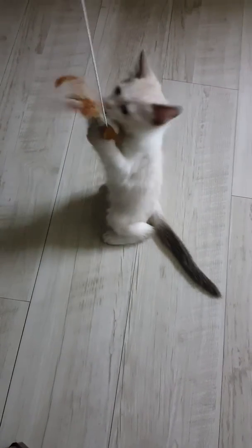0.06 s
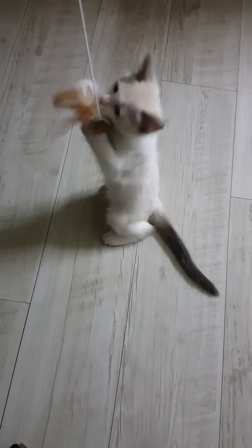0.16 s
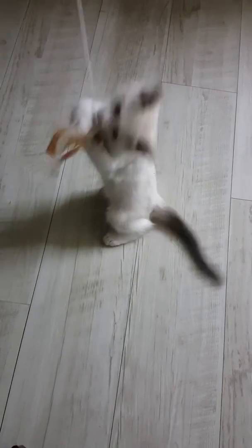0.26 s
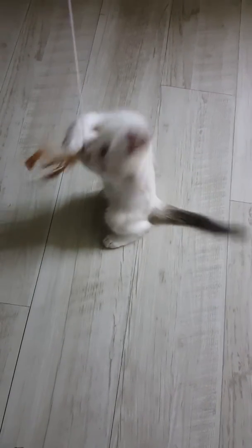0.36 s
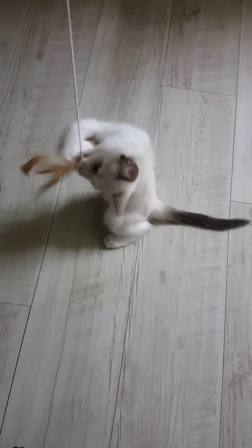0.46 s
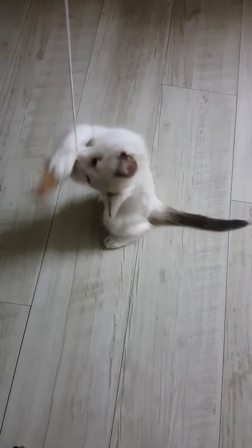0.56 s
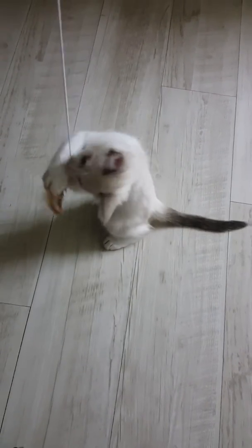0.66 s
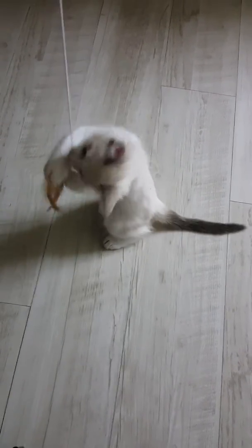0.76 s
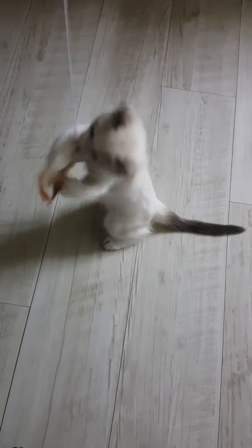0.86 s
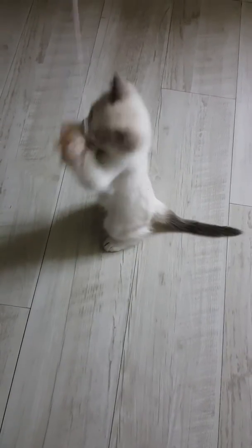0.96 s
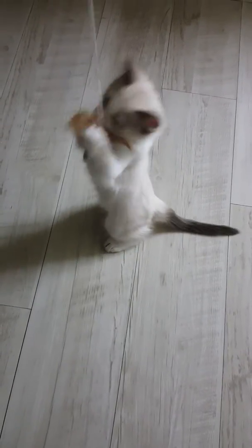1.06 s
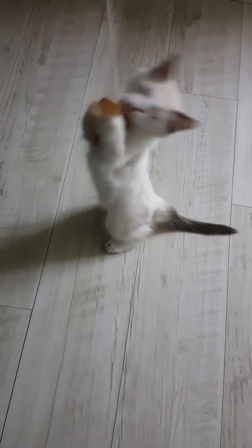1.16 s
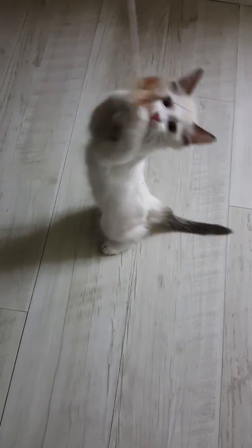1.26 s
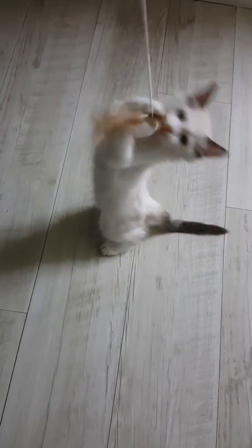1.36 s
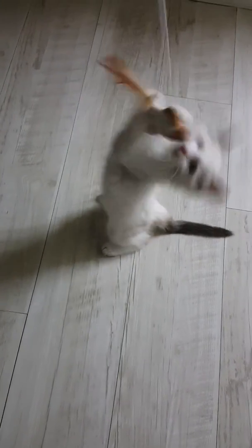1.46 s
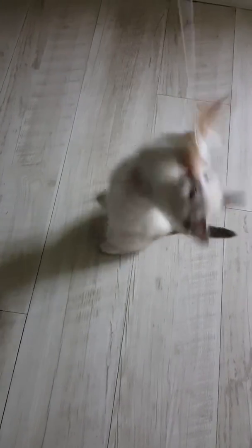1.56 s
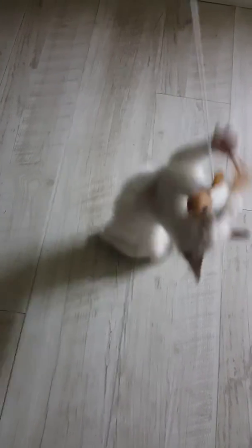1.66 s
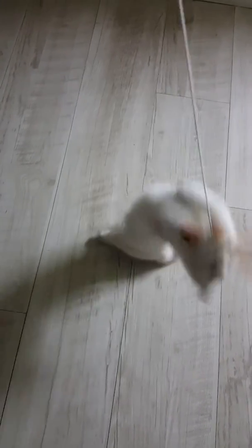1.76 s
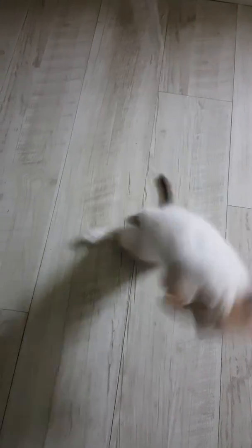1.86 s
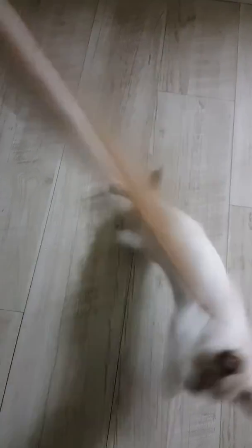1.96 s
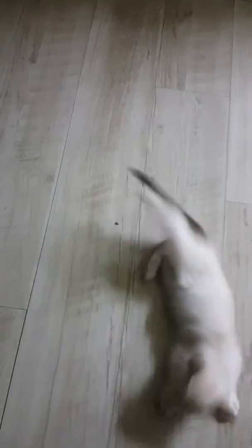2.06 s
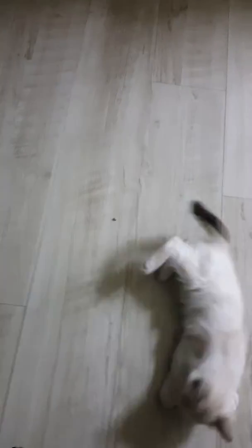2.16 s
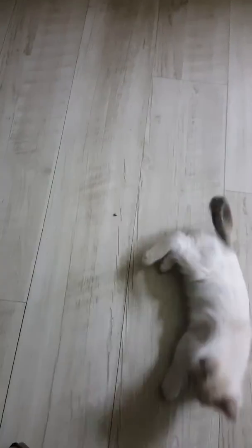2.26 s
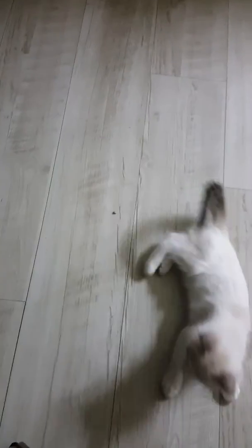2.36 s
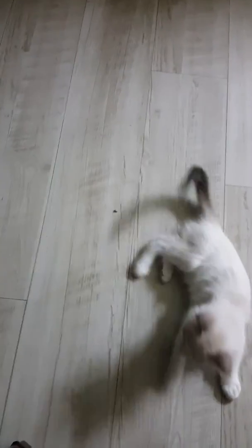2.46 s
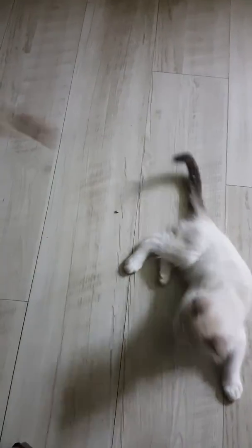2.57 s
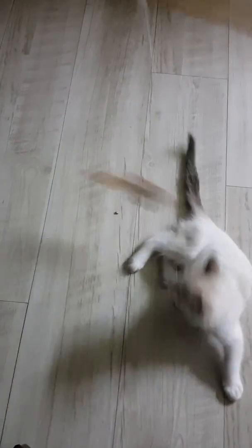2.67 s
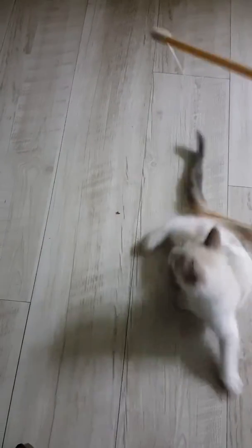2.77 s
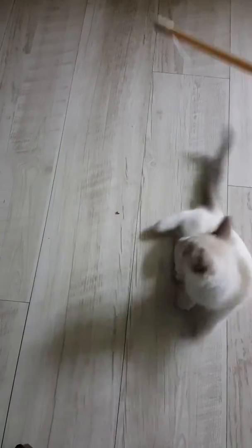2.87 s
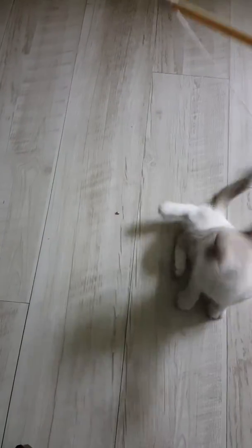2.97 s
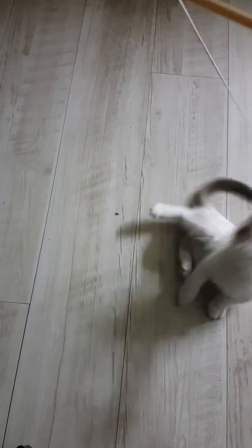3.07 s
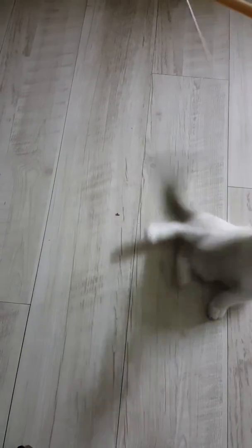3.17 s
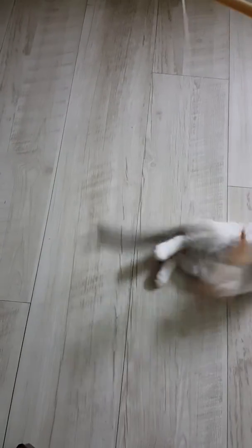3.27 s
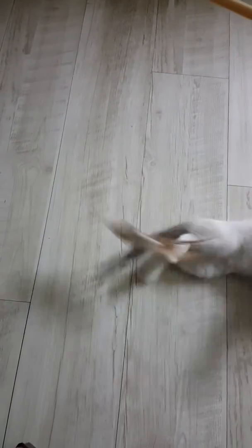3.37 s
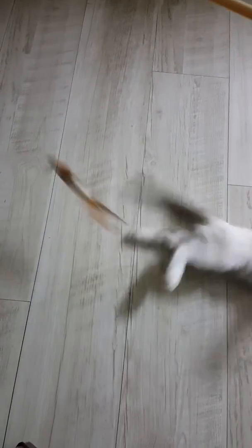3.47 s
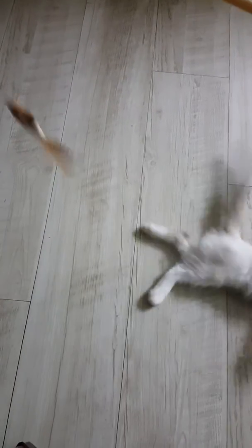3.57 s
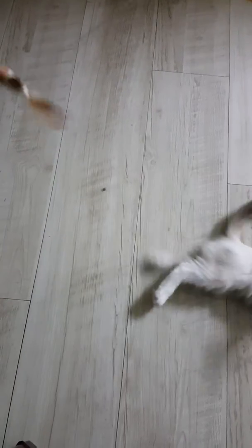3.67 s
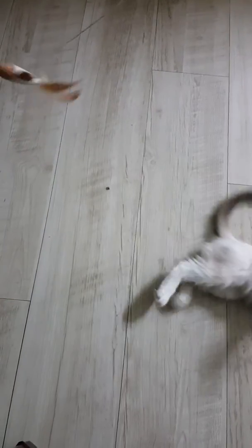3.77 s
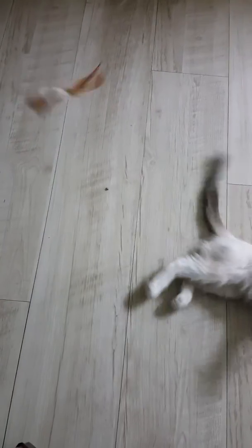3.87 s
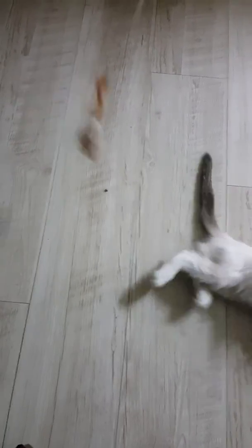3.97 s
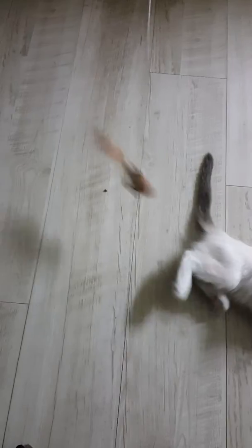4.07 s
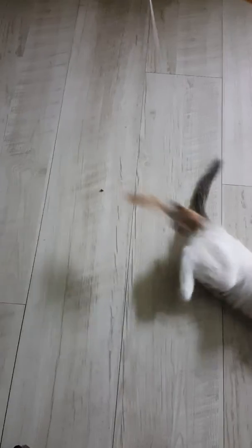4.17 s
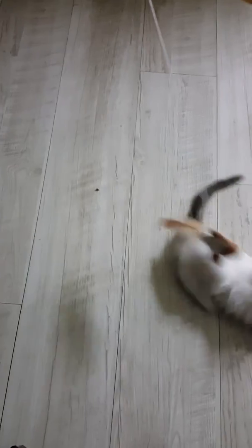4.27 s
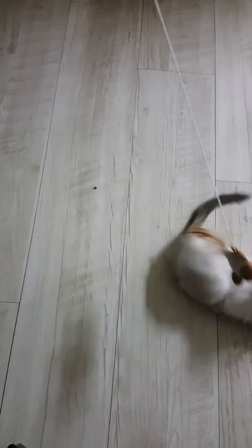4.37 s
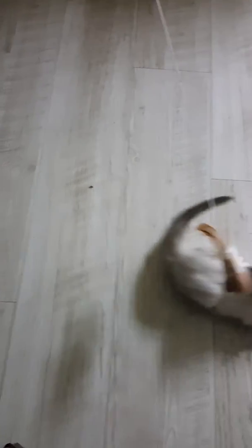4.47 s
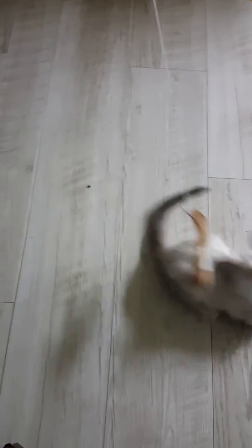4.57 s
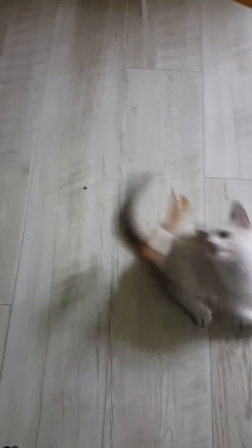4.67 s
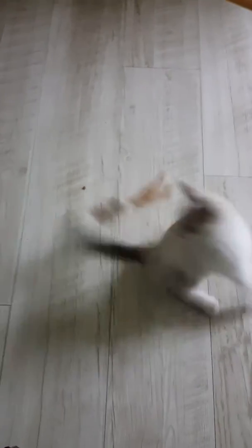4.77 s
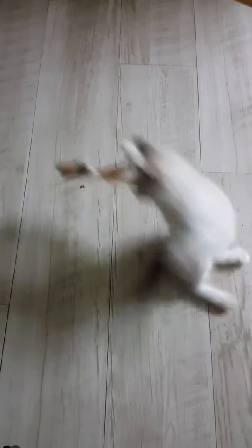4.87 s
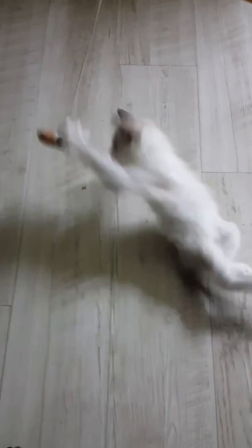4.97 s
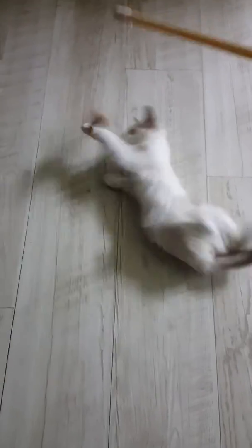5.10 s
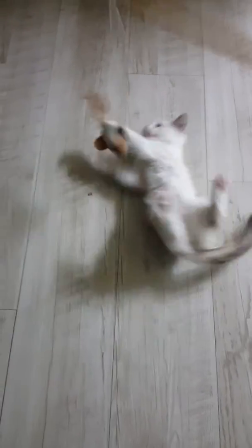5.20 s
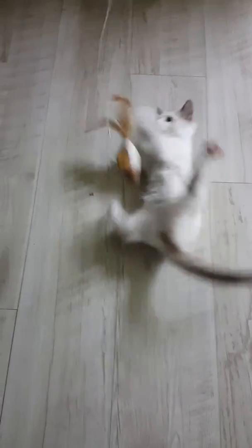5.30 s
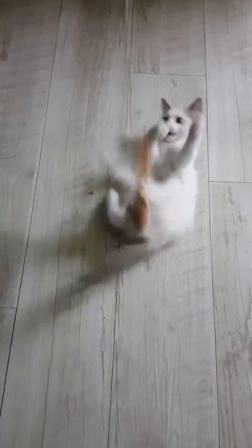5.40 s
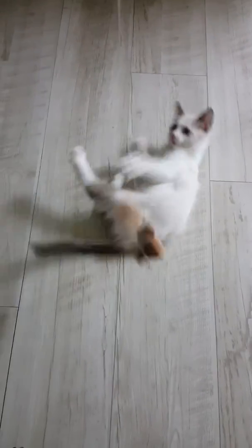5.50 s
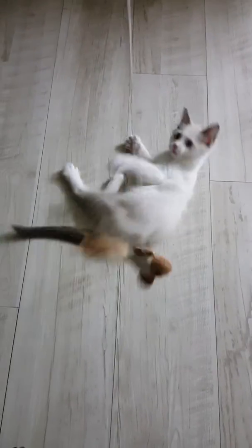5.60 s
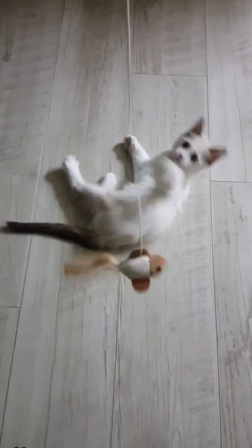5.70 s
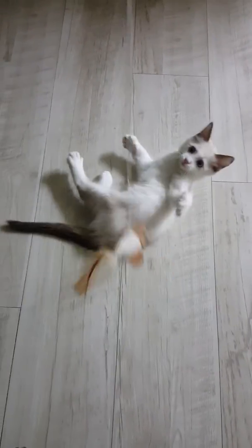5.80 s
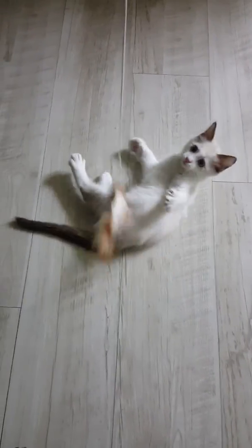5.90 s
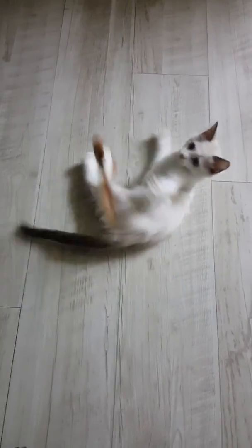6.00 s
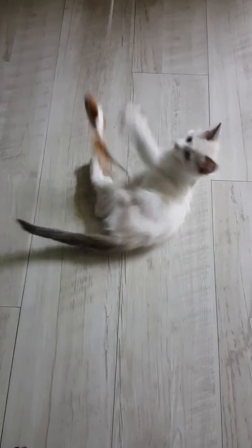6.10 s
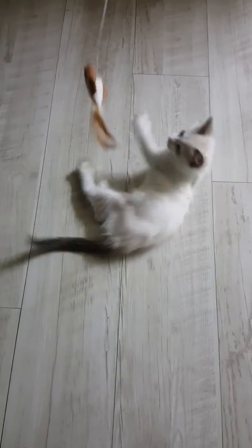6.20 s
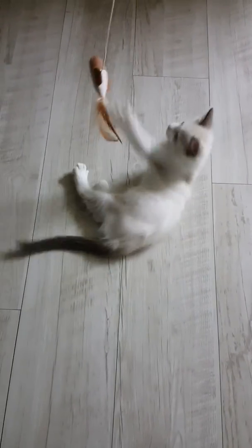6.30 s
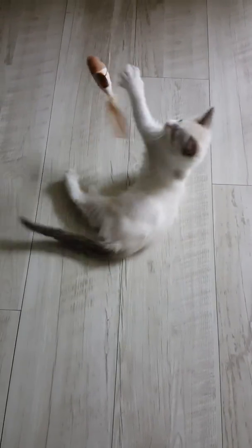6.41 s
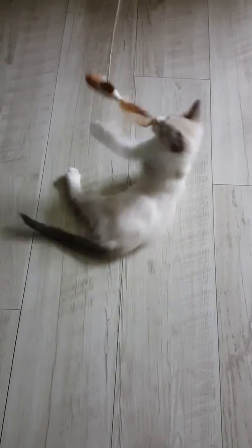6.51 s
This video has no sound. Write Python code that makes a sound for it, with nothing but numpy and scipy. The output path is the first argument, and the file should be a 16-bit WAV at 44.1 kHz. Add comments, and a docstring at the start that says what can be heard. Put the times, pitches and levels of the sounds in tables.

```python
"""Quiet room air, faint hum and hiss, then a soft sweep of fur: a kitten chases a feather toy on laminate.
Scuffs are clumped friction noise; claw and toy ticks are short bursts through one resonance.
Paws thump softly and land hard twice, and fingers knock dully near the end: padded impulses through
plank resonances, plus decaying floor modes. Fingers rub the hand-held camera, lightly early on and more
firmly at the end: stick-slip steps and friction through body resonances. Air puffs are low resonant noise."""
import sys
import numpy as np
from scipy import signal
from scipy.fft import rfft, irfft, next_fast_len
from scipy.io import wavfile
from scipy.ndimage import uniform_filter1d, map_coordinates

SR = 44100
rng = np.random.default_rng(int(sys.argv[2]) if len(sys.argv) > 2 else 0)


def pcm_store(signal):
    """Save signal as 16-bit PCM."""
    levels = np.round(np.clip(np.atleast_2d(signal), -1, 1) * 32767)
    wavfile.write(sys.argv[1], SR, levels.astype(np.int16).T)


N = 288722  # samples

# Still air: spectrum [freq_hz, relative_level_db]; left-right correlation [freq_hz, correlation]
AIR_SPECTRUM = [(12, -38.5), (20, -4), (44, -11), (81, 0.5), (113, -19.5), (133, -7), (233, -7.5),
                (254, -10), (284, -3), (308, -14.5), (408, -12.5), (1210, -21.5), (3800, -27.5),
                (5470, -32), (15800, -37.5)]
AIR_CORRELATION = [(60, 0.93), (200, 0.92), (380, 0.51), (700, .22), (1300, 0)]
AIR_LEVEL_DB = -64
# Distant appliance hum [freq_hz, level_db]
HUM_TONES = [(75, -82), (144, -85.5), (280, -84.5)]
# Microphone hiss spectrum [freq_hz, relative_level_db]
MIC_HISS_SPECTRUM = [(7000, -23), (10500, -13), (11800, -3), (12900, 7), (13200, 0.5), (13600, 10.5),
                     (15500, -1.5)]

# Room decay [freq_hz, t60_s]; echo left-right correlation [freq_hz, correlation]
ROOM_DECAY = [(100, 0.24), (300, 0.27), (700, 0.24), (1500, 0.36), (4000, 0.28), (12000, 0.18)]
ECHO_CORRELATION = [(120, 0.96), (260, 1), (420, -0.52), (650, 0.18), (1200, -0.67), (2200, -0.39),
                    (4500, -0.56)]

# Paws skidding and fur sweeping [full_s, level_db, hold_s, tilt_db_per_octave, rasp_hz]
SCUFF_EVENTS = [(.17, -71.5, 0.067, 2.5, 5070), (.52, -72.5, 0.024, 2, 3170), (1.039, -74.5, 0.16, 1, 8300),
                (2.076, -34, .014, -6.5, 3760), (2.092, -44.5, .035, -7, 2640),
                (2.418, -68, 0.0336, 0, 3900), (2.77, -67.5, 0.0263, 1, 3940),
                (3.492, -68.5, 0.049, 0.5, 3680), (3.585, -59.5, 0.048, -2, 4200),
                (4.915, -64, 0.033, -1, 4400), (5.045, -44.5, 0.0013, -7, 3280),
                (5.202, -54.5, 0.016, 0, 4770), (5.375, -59, 0.0053, -2.5, 4270),
                (5.642, -62, 0.0053, -0.5, 4800), (5.695, -66, .02, -4, 2820),
                (5.76, -66.5, 0.043, -6, 2370), (5.931, -57.5, 0.0083, -0.5, 2640),
                (6.055, -59, 0.067, 1, 2550), (6.324, -54, 0.018, 2, 8900)]
# Fur on floor spectrum [freq_hz, relative_level_db]
FUR_SPECTRUM = [(60, -18.5), (280, 9), (800, 4.5), (1300, -4.5), (2500, -1), (4300, -4.5), (5600, -9),
                (8400, -3), (9500, -15.5), (14000, -14)]
SCUFF_RISE_S, RISE_S_PER_HOLD_S = .0015, 0.29  # long strokes start more gently
SCUFF_FALL_S, FALL_S_PER_HOLD_S = 0.024, 1.4  # and die away more slowly

# Claws and toy ticking on the boards [start_s, level_db, pitch_hz, width_hz]
TICK_EVENTS = [(.917, -48.5, 3300, 2000), (1.055, -50, 4220, 1300), (1.326, -44.5, 3100, 350),
               (1.391, -47.5, 7200, 800), (1.714, -45.5, 5940, 4520), (1.925, -31, 2000, 7900),
               (2.411, -50, 3826, 1205), (4.935, -44, 5063, 3012), (5.201, -38, 6300, 1200)]

# Paws and body meeting the floor; near 6.19 and 6.38 s, dull finger knocks on the camera
# [start_s, level_db, sharpness_hz, spot_hz]
THUMP_EVENTS = [(.943, -46.5, 560, 330), (1.708, -42, 600, 220), (1.712, -40, 890, 244),
                (1.809, -51, 1100, 910), (2.070, -17, 1005, 750), (2.087, -6.5, 950, 600),
                (2.101, -16.5, 800, 906), (2.389, -50, 379, 400), (3.295, -55, 600, 650),
                (3.379, -51, 394, 336), (3.4924, -17, 1120, 1170), (3.655, -48, 600, 720),
                (4.336, -46.5, 600, 600), (4.477, -51, 419.4, 456), (4.925, -43, 197, 104),
                (5.042, -34, 1850, 1580), (5.0482, -28.5, 626, 345), (5.182, -40.5, 450, 560),
                (5.3691, -33, 520, 570), (5.380, -34.5, 504, 610), (5.580, -48, 520, 650),
                (5.646, -39, 558, 475), (5.650, -40, 514, 350), (6.189, -43.5, 337, 230),
                (6.383, -41.5, 1100, 800)]
# Broad resonances of the struck plank [freq_hz, width_hz, gain_db]
PLANK_MODES = [(111.7, 24, -28.5), (262, 21, -7), (345, 150, -2), (520, 120, 1), (610, 130, 4),
               (670, 91, -7), (950, 200, -14), (1300, 180, -20), (1760, 450, -22)]
# Long floor ringing [freq_hz, level_db, t60_s]
FLOOR_RINGING = [(103, -15, 0.32), (145.4, -14, 0.33), (276, -3, 0.19), (350, -10.5, 0.34),
                 (451.3, -10, 0.27), (503, -6.5, 0.3), (570.7, -7, 0.1), (589, -3, 0.21), (627, -5, 0.21),
                 (716, -6.5, 0.31), (854, -9.5, 0.27), (887, -7.5, 0.357), (992, -8.5, .22),
                 (2000, -11.5, 0.21)]
# Reference pad sharpness, its weight boost, extra boost of softer contacts
PAD_HZ, WEIGHT_DB, WEIGHT_DB_PER_OCTAVE = 600, 5, 7.5

# Fingers shifting on the camera [full_s, level_db, hold_s, sliding_speed_0_to_1]
RUB_STROKES = [(0.943, -51, 0.011, 0.21), (1.031, -52.5, 0.038, 0), (1.08, -60, .025, 0.36),
               (1.2, -64, 0.032, 0.2), (6.199, -55, 0.025, 0.19), (6.318, -59.5, 0.082, 0.39),
               (6.386, -44, 0.033, .52), (6.433, -41.5, 0.027, 0.7), (6.467, -44.5, 0.039, .95),
               (6.52, -41, .012, 0.53)]
RUB_RISE_S, RUB_FALL_S = 0.0032, 0.061  # catches quickly, lets go slowly
# Best sliding speed, loss in dB per unit of speed away from it
FLEXING, SCRAPING, HISSING = (.02, 11.6), (0.6, 20.5), (0.88, 33)
# Low resonances of the camera body [freq_hz, width_hz, gain_db]
BODY_FLEX_MODES = [(259, 76, 0.5), (351, 58, -8.5)]
# Hollow ring of the camera case [freq_hz, width_hz, gain_db]
CASE_MODES = [(800, 210, -0.5), (962, 62, -1), (1180, 37, -12)]
# Finger hiss spectrum [freq_hz, relative_level_db]
FINGER_HISS_SPECTRUM = [(1000, -22.5), (1600, -3.5), (2600, -10), (3500, -8), (4500, 2.5), (5500, -11),
                        (7300, -0.5), (8500, -6), (9500, -17), (15000, -14.5)]
# Puffs of air at the microphone [full_s, level_db]
AIR_PUFFS = [(3.53, -61), (4.22, -71), (4.909, -56.5), (5.251, -77), (5.52, -65), (5.84, -58),
             (6.219, -55.5)]
PUFF_RISE_S, PUFF_HOLD_S, PUFF_FALL_S = 0.017, 0.039, 0.29

# Microphone pair [freq_hz, left_minus_right_db]
PORT_DIFFERENCE = [(100, 0.5), (280, -0.5), (600, -1), (1000, 0.5), (2000, 3.5), (4500, -1.5), (7500, 2),
                   (12000, 1.5)]
TOP_HZ = 15850


def amp(db):
    """Decibels to amplitude ratio."""
    return 10 ** (np.asarray(db) / 20)


def unit(x):
    """Scale to unit RMS."""
    return x / np.sqrt(np.mean(x ** 2) + 1e-20)


def along(points, hz):
    """Interpolate (freq_hz, value) points on a log frequency axis."""
    freq_hz, values = np.transpose(points)
    return np.interp(np.log(hz + 1), np.log(freq_hz), values)


def wobble(knots_per_s):
    """Smooth random curve."""
    knots = rng.standard_normal(int(N * knots_per_s / SR) + 4)
    return map_coordinates(knots, [np.arange(N) * knots_per_s / SR])


def filtered(x, response):
    """Multiply the spectrum of x by a complex response of frequency in Hz."""
    n = x.shape[-1]
    padded = next_fast_len(n + 8192)  # space for the filter to ring out
    spectrum = rfft(x, padded) * response(np.fft.rfftfreq(padded, 1 / SR))
    return irfft(spectrum, padded)[..., :n]


def resonances(modes, f):
    """Summed causal response of (freq_hz, width_hz, gain_db) resonances."""
    return sum(amp(gain_db) * 1j * f * width_hz / (hz * hz - f * f + 1j * f * width_hz)
               for hz, width_hz, gain_db in modes)


def spread(pair, correlation):
    """Mix two unrelated signals to left and right with the given correlation."""
    def mix(f):
        angle = np.arccos(np.clip(along(correlation, f), -1, 1)) / 2
        return np.array([np.cos(angle), np.sin(angle)])

    mid, side = filtered(pair, mix)
    return np.array([mid + side, mid - side])


def add(track, start_s, x):
    """Mix x into the track in place."""
    part = track[..., max(round(start_s * SR), 0):][..., :x.shape[-1]]
    part += x[..., :part.shape[-1]]


def swell(t, rise_s, hold_s, fall_s):
    """Rise to full strength at t = 0, hold, then fade by 20 dB per fall_s."""
    rise = np.exp(-(np.minimum(t, 0) / rise_s) ** 2)
    return rise * amp(-20 * np.maximum(t - hold_s, 0) / fall_s)


def friction(shape, grain_db):
    """Countless tiny slips of uneven size, clumped over about a millisecond."""
    clumps = unit(uniform_filter1d(rng.standard_normal(shape), size=48))
    return unit(rng.standard_normal(shape) * amp(grain_db * clumps))


def echoes(x, early_db, early_t60_s, gap_s):
    """Fresh stereo room answer at the RMS of x: dense early echoes of floor and furniture, then the walls' tail."""
    hz, t, noise = signal.stft(rng.standard_normal((2, SR // 2)), SR, nperseg=256)
    late = amp(-60 * t / along(ROOM_DECAY, hz)[:, None])
    early = amp(early_db - 60 * t / early_t60_s)
    tail = spread(signal.istft(noise * (late + early), SR, nperseg=256)[1], ECHO_CORRELATION)
    tail *= np.arange(tail.shape[1]) / SR > gap_s
    wet = signal.fftconvolve(x[None], tail, axes=1)[:, :len(x)]
    return unit(wet) * np.sqrt(np.mean(x ** 2))


def room_tone(mic_hiss_db=-85):
    """Partly correlated air noise, hum wavering in level and phase, and independent microphone hiss."""
    air = spread(rng.standard_normal((2, N)), AIR_CORRELATION)
    air = unit(filtered(air, lambda f: amp(along(AIR_SPECTRUM, f))))
    t = np.arange(N) / SR
    hum = sum(amp(db + 1.5 * wobble(5.2)) * np.sin(2 * np.pi * hz * t + .9 * wobble(5.2))
              for hz, db in HUM_TONES)
    mic_hiss = unit(filtered(rng.standard_normal((2, N)), lambda f: amp(along(MIC_HISS_SPECTRUM, f))))
    return amp(AIR_LEVEL_DB + .3 * wobble(2)) * air + hum + amp(mic_hiss_db) * mic_hiss


def scuffs(echo_db=-1, rasp_db=7):
    """Friction strokes swell, hold and fade; wood grain adds a rasping band."""
    out = np.zeros((2, N))
    t = np.arange(int(SR * .8)) / SR - .2  # starts early, to contain the rise
    for full_s, level_db, hold_s, tilt_db, rasp_hz in SCUFF_EVENTS:
        def colour(f):
            rasp = rasp_db * np.exp(-(np.log2((f + 1) / rasp_hz) / 0.47) ** 2)
            tilt = tilt_db * np.log2(np.maximum(f, 1000) / 3000)
            return amp(along(FUR_SPECTRUM, f) + rasp + tilt)

        slips = unit(filtered(friction(len(t), grain_db=3), colour))
        rise_s = SCUFF_RISE_S + RISE_S_PER_HOLD_S * hold_s
        fall_s = SCUFF_FALL_S + FALL_S_PER_HOLD_S * hold_s
        stroke = slips * swell(t, rise_s, hold_s, fall_s)
        wet = echoes(stroke, early_db=1.5, early_t60_s=0.08, gap_s=0.001403)
        add(out, full_s + t[0], amp(level_db) * (stroke + amp(echo_db) * wet))
    return out


def ticks(echo_db=0):
    """Hard tips snap, with a few milliseconds of scratch behind, through one resonance."""
    out, t = np.zeros((2, N)), np.arange(SR // 3) / SR
    for start_s, level_db, pitch_hz, width_hz in TICK_EVENTS:
        scratch = 0.054 * rng.standard_normal(len(t)) * amp(-60 * t / 0.011)
        burst = (t == 0) + scratch
        click = filtered(burst, lambda f: resonances([(pitch_hz, width_hz, 0)], f))
        click /= np.abs(click).max()
        wet = echoes(click, early_db=6.5, early_t60_s=0.042, gap_s=0.0045)
        add(out, start_s, amp(level_db) * (click + amp(echo_db) * wet))
    return out


def boost(f, hz, width_hz, gain_db):
    """Resonant peak over a flat response."""
    return 1 + (amp(gain_db) - 1) * resonances([(hz, width_hz, 0)], f)


def thumps(echo_db=1, ring_db=-19, spot_db=5, underlay_hz=2200):
    """A padded blow bends one plank and rings the floor, softer ones duller; finger knocks use the same model."""
    out, t = np.zeros((2, N)), np.arange(SR // 2) / SR
    for start_s, level_db, sharp_hz, spot_hz in THUMP_EVENTS:
        weight_db = WEIGHT_DB + WEIGHT_DB_PER_OCTAVE * np.log2(PAD_HZ / sharp_hz)

        def drive(f):
            pad = 1 / (1 + 1.3j * f / sharp_hz - (f / sharp_hz) ** 2) / (1 + .4j * f / sharp_hz)
            # underlay swallows the treble
            underlay = 1 / (1 + 1j * f / underlay_hz - (f / underlay_hz) ** 2)
            spot = boost(f, spot_hz, spot_hz / 4, spot_db)
            joists = boost(f, 160, 140, weight_db)  # driven by body weight
            return pad * underlay * spot * joists

        knock = filtered(1. * (t == 0), lambda f: -drive(f) * resonances(PLANK_MODES, f))
        knock /= np.abs(knock).max()

        def phase_cycles(hz):
            # shorter waves reach the two ports further out of step
            start = rng.random()
            side = rng.choice([-1, 1]) * np.array([[1], [-1]])
            return start + side * np.minimum(hz / 5500, .125)

        ring = 0
        for hz, mode_db, t60_s in FLOOR_RINGING:
            strength = abs(drive(hz)) * amp(mode_db + rng.normal(0, 1) - 60 * t / t60_s)
            ring = ring + strength * np.sin(2 * np.pi * (hz * t + phase_cycles(hz)))
        ring *= amp(ring_db) * (1 - np.exp(-t / 0.0026))
        wet = echoes(knock, early_db=-0.5, early_t60_s=0.032, gap_s=.002)
        direct = knock * amp([[-.5], [.5]])
        add(out, start_s, amp(level_db) * (direct + ring + amp(echo_db) * wet))
    return out


def rubbing(best_speed, loss_db):
    """Envelope of the strongest finger stroke driving a part that favours one sliding speed."""
    t = np.arange(N) / SR
    strokes = [amp(level_db - loss_db * abs(speed - best_speed))
               * swell(t - full_s, RUB_RISE_S, hold_s, RUB_FALL_S)
               for full_s, level_db, hold_s, speed in RUB_STROKES]
    return np.max(strokes, axis=0)


def draught():
    """Strength of the stirred air: every puff has the same shape."""
    t = np.arange(N) / SR
    return sum(amp(level_db) * swell(t - full_s, PUFF_RISE_S, PUFF_HOLD_S, PUFF_FALL_S)
               for full_s, level_db in AIR_PUFFS)


def handling(base_slips_per_s=260, smooth_db=-6):
    """Skin sticks and slips on the camera's hollow case and hisses at its ports; stirred air rumbles faintly."""
    slip_count = np.floor(np.cumsum(base_slips_per_s * amp(4 * wobble(150))) / SR)
    slips = np.diff(slip_count, prepend=0) * amp(2.4 * wobble(120))
    drive = unit(slips - slips.mean()) + amp(smooth_db) * friction((2, N), grain_db=0.5)
    flex = unit(filtered(drive, lambda f: resonances(BODY_FLEX_MODES, f) / (1 + (f / 450) ** 4)))
    scrape = unit(filtered(drive, lambda f: resonances(CASE_MODES, f) / (1 + (f / 1350) ** 8)))
    hiss = unit(filtered(friction((2, N), grain_db=1.5),
                         lambda f: amp(along(FINGER_HISS_SPECTRUM, f)) * f / (f + 300)))
    rumble = unit(filtered(rng.standard_normal(N), lambda f: resonances([(35.1, 21, 0)], f) ** 2))
    rub = rubbing(*FLEXING) * flex + rubbing(*SCRAPING) * scrape + rubbing(*HISSING) * hiss
    return rub * amp([[-1.5], [1.5]]) + draught() * rumble


def scene():
    """Sum of all sources, left and right."""
    return room_tone() + scuffs() + ticks() + thumps() + handling()


def record(dry):
    """The two ports colour the sound a little differently; nothing is kept above the band limit."""
    def ports(f):
        return amp(np.outer([.5, -.5], along(PORT_DIFFERENCE, f))) * (f < TOP_HZ)

    return filtered(dry, ports)


dry = scene()
out = record(dry)
pcm_store(out)
```